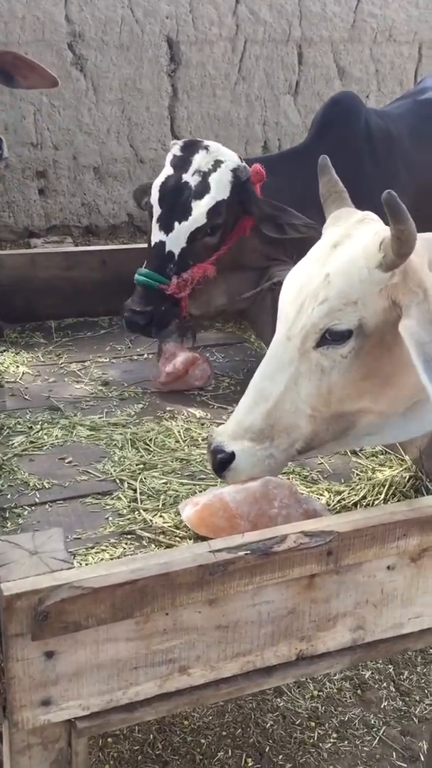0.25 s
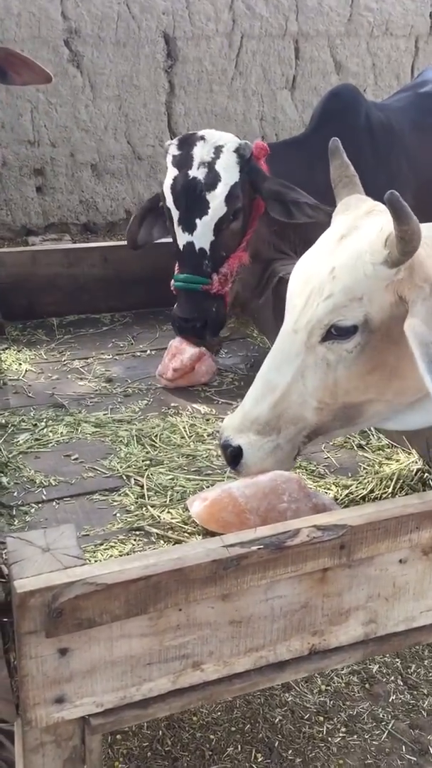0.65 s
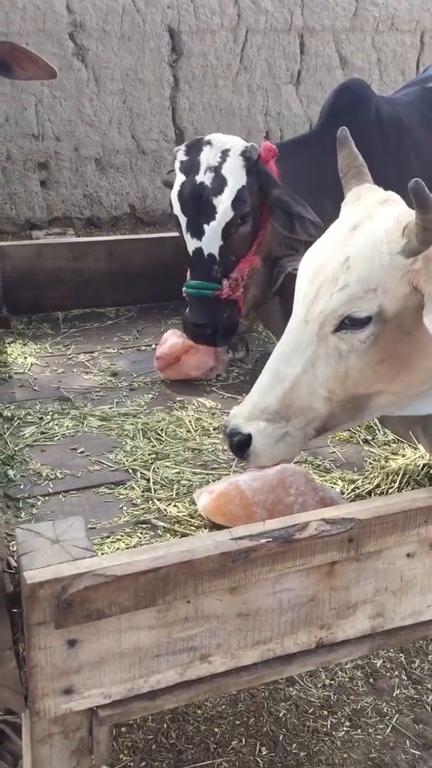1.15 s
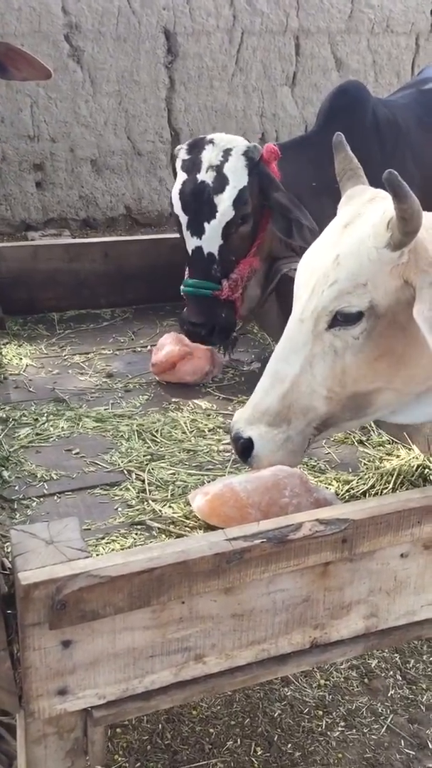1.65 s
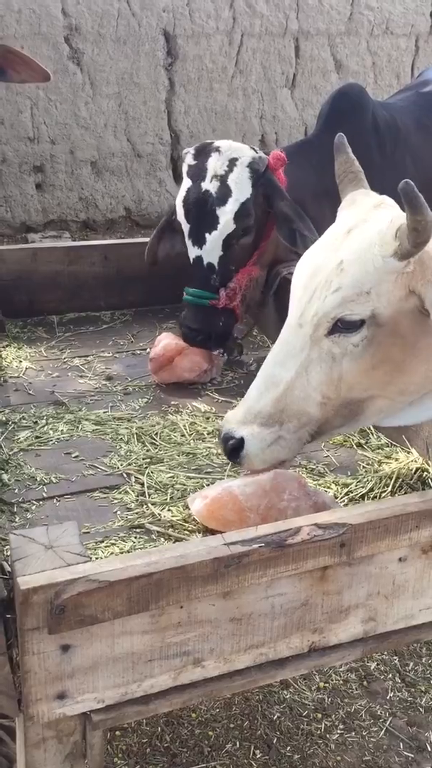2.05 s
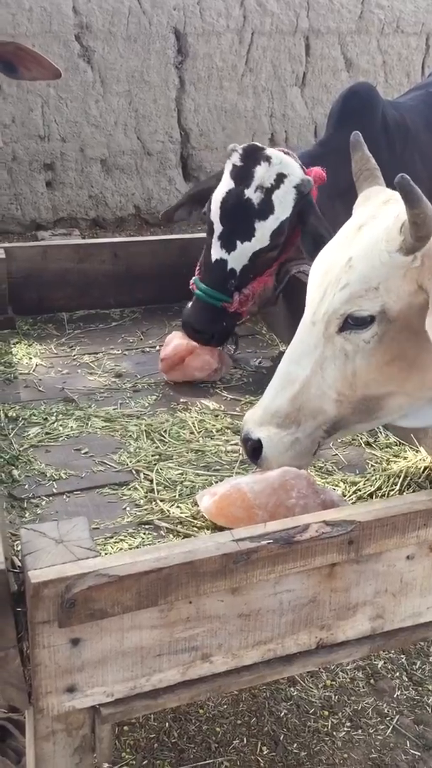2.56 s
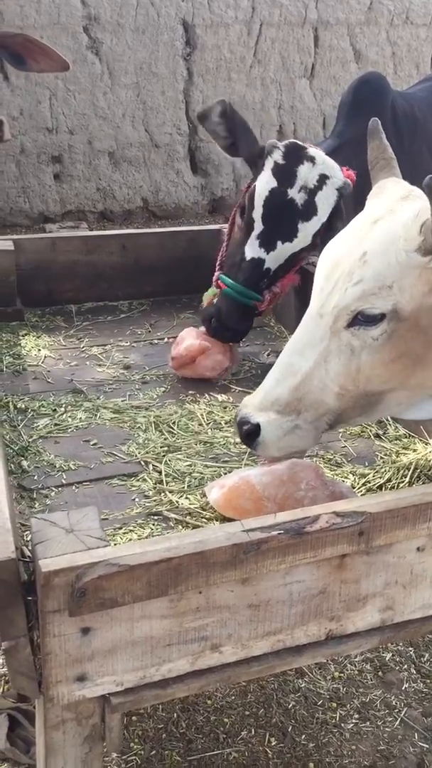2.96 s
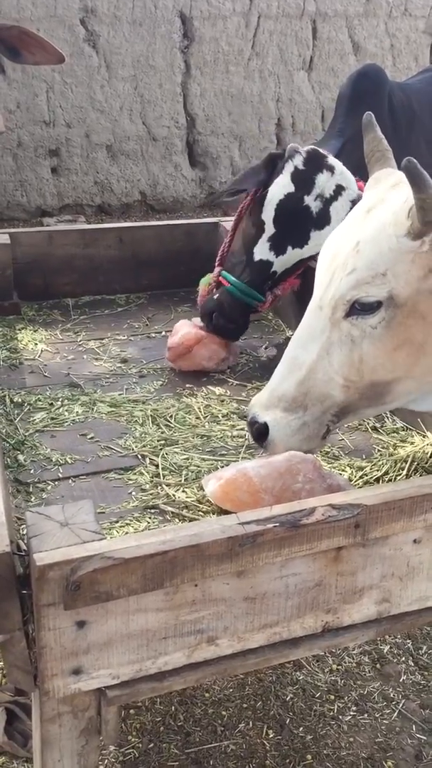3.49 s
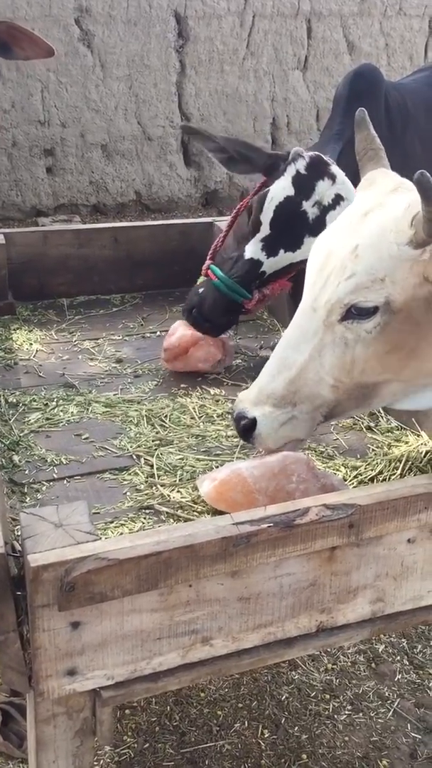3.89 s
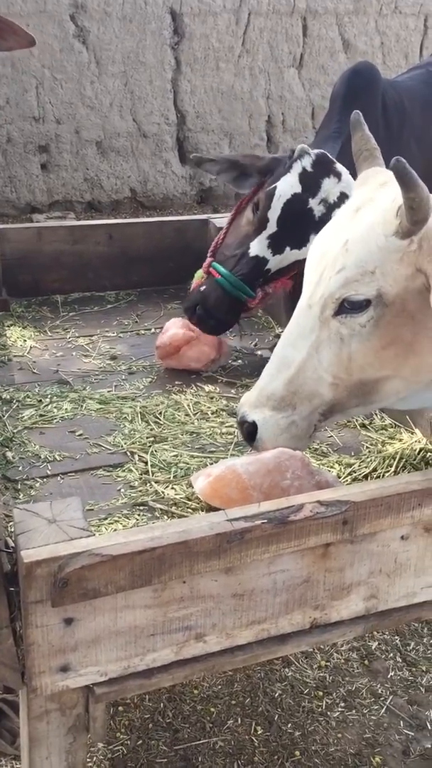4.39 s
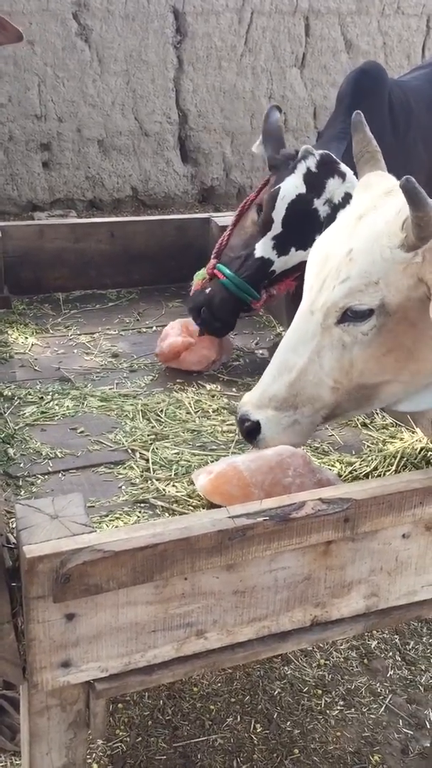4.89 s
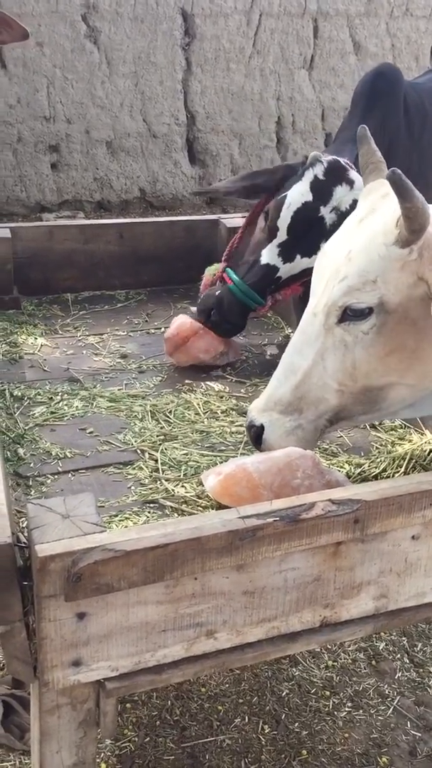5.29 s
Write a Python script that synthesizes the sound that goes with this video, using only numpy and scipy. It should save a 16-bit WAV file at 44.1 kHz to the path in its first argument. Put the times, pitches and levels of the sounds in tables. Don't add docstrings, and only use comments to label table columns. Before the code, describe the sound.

An early flurry of rough tongue strokes and wooden knocks eases into quieter wet dabs, then rasping returns around one second. Bright crackling snaps follow near 1.7 seconds, and heavier knocks cluster near three. Licking, dragging and hollow thuds continue unevenly to the end. Small squeaks and occasional faint sparrows sit above light breeze and low rumble, with a short dull echo from mud walls and a near microphone.

```python
import sys
import numpy as np
from scipy import signal
from scipy.fft import rfft, irfft, next_fast_len
from scipy.io import wavfile
from scipy.ndimage import uniform_filter1d

SR = 44100
rng = np.random.default_rng(int(sys.argv[2]) if len(sys.argv) > 2 else 0)


def dump(signal):
    limited = np.clip(np.atleast_2d(signal).T, -1, 1)
    pcm = np.round(limited * 32767).astype(np.int16)
    wavfile.write(sys.argv[1], SR, pcm)


def elevation(decibels):
    levels = np.asarray(decibels, float)
    return 10 ** (levels / 20)


N = 244307

# f/Hz, level/dB, t60/s
BOARDS = [(73.6, -42, 0.24), (103.4, -3, 0.18), (131.9, 5, 0.11), (159.7, -0.5, 0.11), (204.7, -3, 0.12)]
# f/Hz, level/dB, t60/s
BOX = [(245.2, 2.5, 0.06), (284, 1.5, 0.07), (309.8, 1.5, 0.084), (349, -7.5, 0.073), (387, -3.5, 0.069)]
# f/Hz, level/dB, t60/s
CRACK = [(520, -20, 0.21), (573, -2.5, 0.13), (685, 1, 0.06), (739, 3.5, 0.069), (882, 0, 0.053),
         (950, -2, 0.053), (1071, 4, 0.039), (1187, -7.5, 0.052), (1366, -5.5, 0.054), (1500, -3.5, 0.043)]


def unit(x):
    return x / np.sqrt(np.mean(x ** 2))


def band(x, hz, width_hz):
    return signal.lfilter(*signal.iirpeak(hz, hz / width_hz, SR), x)


def walk(rate):
    k = int(SR / rate)
    held = np.repeat(rng.standard_normal(N // k + 1), k)
    return 2.43 * uniform_filter1d(held, k)[:N]


def grains(rate, spread_db):
    struck = rng.random(N) < rate / SR
    return struck * rng.standard_normal(N) * elevation(spread_db * rng.exponential(size=N))


def add(out, s, sound):
    i = int(s * SR)
    out[i:i + len(sound)] += sound[:N - i]


def colour(table, hz):
    f, db = np.transpose(table)
    return np.interp(np.log(hz), np.log(f), db, left=-60, right=-60)


def contacts():
    # t/s, box peak level/dB, floor-board level/dB, tick level/dB, mode nearest the spot f/Hz
    blows = [(0.228, -17, -7, -27, 223), (0.266, -25, -3, -33, 148), (0.303, -27, -3, -17.5, 277),
             (.34, -29.5, -13, -22, 280), (1.347, -30.5, -9, -18, 275), (1.853, -30, -0.5, -42, 132),
             (2.344, -20, -4, -27, 307), (2.615, -15, -4, -21, 283), (2.656, -23, 3.5, -37, 273),
             (2.698, -15, -4.5, -24, 294), (2.719, -20, -1, -15.5, 283), (2.965, -11, -4, -30, 296),
             (2.991, -21.5, -3.5, -41, 206), (3.019, -24, -5, -39, 312), (3.049, -20, -6, -32, 145),
             (3.069, -20.5, -5, -44, 1090), (3.627, -17, -2, -25, 123), (3.944, -22, -1.5, -40, 333),
             (4.214, -32, -8, -41, 348), (4.268, -31, -4, -8, 360), (4.334, -24, 0, -29, 296),
             (4.356, -6.5, -5.5, -26.5, 323.6), (4.815, -31.5, -12.5, -17, 303), (4.929, -16, 1, -11, 140),
             (5.187, -21.5, -3.5, -35, 325), (5.467, -22.5, -6.5, -32, 318),
             (5.513, -12.5, 0.5, -17.5, 298)]
    # t/s, box peak level/dB, floor-board level/dB, crack level/dB, spot f/Hz
    rocks = [(0.056, -43, -18, -14, 262), (0.117, -53, -18, -30.5, 300), (0.167, -35.5, -27, -28, 300),
             (0.208, -33.5, -6, -17, 308), (1.035, -45, -3, 0, 1370), (1.116, -37, -4, -5, 271),
             (1.15, -49, 11, -10, 132), (1.208, -48, 9.5, -18, 205), (1.27, -40, 7.5, -34, 202),
             (1.729, -41, 3.5, -10, 206), (1.784, -42.5, -18, -1.5, 520), (1.944, -35, 11, -5, 140.6),
             (2.183, -42, -19, -16, 285), (2.275, -32.5, 0, -9, 357), (2.541, -42.5, 4, -7, 130),
             (2.843, -32.5, -2, -13.5, 330), (3.118, -39, 4, -4, 130), (3.165, -43, 4, -10, 132),
             (3.213, -47, -3, -10, 132), (3.312, -35, -15, -14.5, 386), (3.49, -71, 19.5, -11, 74),
             (3.562, -44.5, -19, -8.5, 354), (3.617, -33, 2, -11, 313), (3.662, -30, 4, -8.5, 138),
             (3.715, -40.5, 3, -6, 1110), (3.775, -51, 4, 4.5, 990), (3.877, -41, -6, -10, 373),
             (4.025, -29.5, 0.5, -11.5, 310), (4.058, -33, 8, -29, 106.3), (4.318, -32, 6, -2, 151),
             (4.391, -27, -2, -10, 132), (4.509, -38.5, 2.5, -3, 1077), (4.525, -37.5, -2.5, -9.5, 105),
             (4.71, -50.5, -10, -6, 248), (4.867, -34, -7, -5.5, 385), (5.117, -51, -10, -17, 310),
             (5.223, -34.5, 5.5, -10, 104), (5.355, -38.5, -9, -1.5, 383), (5.448, -47, -13, -11, 314),
             (5.493, -30, 5, -6, 1077)]
    # t/s, crack peak level/dB, tick level over the crack/dB,
    # box level against the crack/dB, spot f/Hz
    taps = [(.062, -51, 6, -1, 1366), (2.553, -57.5, 2, 0, 1500), (2.782, -46.5, -7.5, -10, 1500),
            (4.161, -52, -3, -16, 1187), (4.526, -58, -0.5, -3, 1077), (.447, -33, -3.5, -15.5, 890),
            (0.783, -47, -9, -14, 580), (0.857, -43, -18, -23, 1090), (1.467, -46, -20, -7, 1110),
            (2.915, -33, -10, -25, 1187), (4.438, -35.5, -2.5, -1, 920), (4.983, -40.5, 0, 1, 296),
            (5.298, -43, -10, -15, 750)]
    hits = [(s, db, board_db, -8, tick_db, 0.79, hz, False) for s, db, board_db, tick_db, hz in blows]
    hits += [(s, db, board_db, crack_db, -32.5, 0.78, hz, False) for s, db, board_db, crack_db, hz in rocks]
    hits += [(s, db + box_db, 5.5, -box_db, tick_db - box_db, 0.93, hz, True)
             for s, db, tick_db, box_db, hz in taps]
    return hits


def rumble():
    # t/s, level/dB
    puffs = [(.6, -50), (.85, -64), (1.42, -49), (2.85, -44), (4.68, -50), (.01, -43), (.68, -51),
             (1.08, -41), (1.68, -44), (3.2, -61), (3.5, -49), (4.98, -48), (5.28, -44.5)]
    shake_db, decay_s = -20.5, 0.052
    kicks, keep = np.zeros(N), np.exp(-1 / (decay_s * SR))
    trembles = [(s, db + board_db + shake_db) for s, db, board_db, *_ in contacts()]
    for s, db in trembles + puffs:
        add(kicks, s, np.array([elevation(db)]))
    return uniform_filter1d(signal.lfilter([1], [1, -keep], kicks), SR // 100)


def yard():
    # f/Hz, level per Hz/dB
    air = [(40, -6), (100, -16.5), (200, 1), (500, -16.5), (1300, -12), (3000, -18.5), (7000, -24.5),
           (15500, -28)]
    yard_db, swell_db, flicker_db = -64.5, 0.3, 0.9
    breeze_db, gust_db, gusts_per_s = -63, 3, 3.8
    out, swell = 0, walk(1.0)
    for hz in 42 * 2 ** np.arange(0, 8.6, 0.5):
        gain = elevation(colour(air, hz) + swell_db * swell + flicker_db * walk(3.62))
        noise = rng.standard_normal(N)
        out = out + gain * band(band(noise, hz, 0.62 * hz), hz, 0.62 * hz)
    breeze = unit(band(band(rng.standard_normal(N), 54.4, 58), 54.4, 58))
    gusts = elevation(breeze_db + gust_db * walk(gusts_per_s))
    return elevation(yard_db) * unit(out) + (gusts + rumble()) * breeze


def strokes():
    # t/s, length/s, rasp level/dB, share spent pressing harder, mouth resonance f/Hz
    licks = [(0, 0.14, -55, 0.035, 8300), (0.091, 0.16, -47, 0.83, 6000), (0.197, 0.14, -42.5, 0.57, 8500),
             (0.85, 0.24, -63.5, 0.51, 11400), (0.988, 0.14, -49.5, 0.47, 5800),
             (1.084, 0.14, -51.5, 0.52, 6250), (1.592, 0.1, -49.5, 1, 9400),
             (1.715, 0.058, -63, .45, 12000), (1.863, 0.14, -61, 0.25, 6900),
             (1.965, 0.037, -67, 0.4, 12000), (1.99, 0.11, -50.5, 0.4, 5740), (2.049, 0.094, -51, 1, 12300),
             (2.341, 0.032, -43.5, 0.47, 9400), (2.876, 0.12, -53.5, 0.46, 7500),
             (2.961, 0.052, -44.5, 0.52, 8850), (2.997, 0.08, -46, .6, 6300),
             (3.058, 0.078, -53, 0.18, 9300), (3.555, 0.13, -60, 0.56, 10800),
             (3.641, 0.056, -47.5, 0.45, 5540), (3.684, 0.11, -47, 0.28, 7940),
             (3.769, 0.18, -58.5, .46, 6560), (3.905, 0.083, -49.5, 0.82, 6000),
             (4.25, 0.14, -51.5, 0.74, 6340), (4.364, 0.066, -50, 0.88, 8700),
             (4.665, 0.23, -60, 0.09, 7160), (4.777, 0.16, -56, 0.74, 6300),
             (4.862, 0.096, -47.5, 0.61, 8500), (4.936, .075, -44.5, 0.38, 5400),
             (5.45, 0.15, -54.5, 0.73, 8500)]
    # t/s, length/s, rasp level/dB, spit level over the rasp/dB
    dabs = [(0.332, 0.12, -78, -3), (3.99, 0.067, -73, -2), (4.438, 0.056, -72, 10),
            (5.008, 0.054, -71, -3), (0, 0.098, -76, 11.5), (0.28, 0.14, -64, 8), (0.754, 0.16, -76, 15.5),
            (1.197, 0.37, -74.5, 7.5), (1.443, 0.047, -66.5, 7), (1.63, 0.092, -66.5, 4.5),
            (2.154, 0.25, -70.5, 7), (2.284, 0.066, -64, 0), (2.377, 0.19, -77, 9),
            (2.543, 0.38, -73.5, 9.5), (2.986, 0.1, -63.5, 10), (3.082, 0.14, -71.5, 6.5),
            (3.203, 0.31, -79, 6.5), (3.473, 0.029, -65, -7), (4.084, 0.26, -72.5, 6.5),
            (5.121, 0.11, -72, 9.5), (5.198, 0.056, -86.5, 28.5), (5.277, 0.34, -77, 6),
            (5.488, 0.22, -67, 20)]
    full = [(*lick, -9) for lick in licks]
    return full + [(s, length, db, 0.26, 10000, spit_db) for s, length, db, spit_db in dabs]


def stroke_shapes():
    for s, length, db, rise, mouth_hz, spit_db in strokes():
        u = np.linspace(0, 1, int(length * SR))
        rise = np.clip(rise, 0.05, 0.95)
        press = np.minimum(u / rise, (1 - u) / (1 - rise))
        shape = elevation(db - 5.14 * (1 - press)) * np.minimum(press / 0.45, 1)
        slide = np.exp(-1 / (SR * 0.0099))
        tail = signal.lfilter([1 - slide], [1, -slide], np.append(shape, np.zeros(SR // 10)))
        yield s - 0.006, tail, mouth_hz, spit_db


def tongues():
    # f/Hz, level per Hz/dB
    rasp = [(2300, -11.5), (3500, -5.5), (5800, -3.5), (7400, -5.5), (8700, 1.5), (12000, -2), (14000, -4),
            (16500, -6.5)]
    # f/Hz, level per Hz/dB
    wet_drag = [(90, -4), (300, 4), (500, -4.5), (800, 8), (1300, -0.5), (2100, 5.5), (3500, -24.5),
                (5200, -10)]
    mouth_db, mouth_octaves = 7, 0.21
    flurry_db, flicker_db = 0.8, 1.4
    size = next_fast_len(N)
    slips = rfft(unit(grains(5000, 0.85)) + 0.66 * rng.standard_normal(N), size)
    octaves = np.log2(np.arange(1, len(slips) + 1) * SR / size)
    out, flurry, shapes = 0, walk(70), list(stroke_shapes())
    for hz in 94 * 2 ** np.arange(0, 7.4, 1 / 3):
        gain = np.zeros(N)
        for s, shape, mouth_hz, spit_db in shapes:
            mouth = np.exp(-(np.log2(hz / mouth_hz) / mouth_octaves) ** 2)
            rasp_db = colour(rasp, hz) + mouth_db * mouth
            wet_db = colour(wet_drag, hz) + spit_db + 3.5
            add(gain, max(s, 0), shape * (elevation(rasp_db) + elevation(wet_db)))
        third = irfft(slips * np.exp(-18 * (octaves - np.log2(hz)) ** 2), size)[:N]
        out = out + gain * elevation(flurry_db * flurry + flicker_db * walk(60)) * third
    return elevation(-1.35) * out


def squelch():
    wet, bubbles, t = np.zeros(N), np.zeros(N), np.arange(400) / SR
    for s, shape, _, spit_db in stroke_shapes():
        add(wet, max(s, 0), shape * elevation(spit_db))
    for when, pitch, size, cycles in rng.random((1500, 4)):
        hz = 1300 * 2 ** (2.2 * pitch)
        fade_s = (3 + 9 * cycles) / hz / 2
        envelope = np.exp(-t / fade_s) * (1 - np.exp(-t / 0.00049))
        bubble = np.sin(2 * np.pi * hz * t * (1 + 12 * t)) * envelope
        add(bubbles, when * N / SR, elevation(-3.0 * np.log(size + 0.061)) * bubble)
    return elevation(-6.0) * wet * unit(bubbles)


def pressure(board_share):
    # t/s, length/s, weight on the wood level/dB, lean from boards to box/dB
    drags = [(0, 0.053, -52.5, 1), (0.218, 0.13, -39.5, 2.5), (0.387, 0.17, -56.5, -6.5),
             (0.595, 0.11, -74, -16), (1.028, 0.11, -48, 0), (1.212, 0.16, -50, -26),
             (1.678, 0.087, -51, -14), (1.852, 0.18, -46.5, -24.5), (2.186, 0.24, -49.5, -2),
             (2.596, 0.17, -43, -5.5), (2.82, 0.085, -51, -3), (2.964, 0.17, -41, -4.5),
             (3.106, 0.071, -46.5, -23), (3.64, 0.11, -43.5, -9), (3.946, 0.11, -35, -15),
             (4.23, 0.34, -46, -15), (4.43, 0.23, -60.5, -5), (4.787, 0.26, -46.5, -7),
             (5.178, 0.22, -57, -28), (5.453, .1, -48.5, -2)]
    attack_s, release_s, rest_db, rest_lean_db = 0.016, 0.022, -73.5, -9
    t = np.arange(N) / SR
    out = elevation(rest_db - board_share * rest_lean_db)
    for s, length, db, lean_db in drags:
        attack = np.clip((t - s) / attack_s + 1, 0, 1)
        release = np.exp(-np.maximum(t - s - length, 0) / release_s)
        out = out + elevation(db - board_share * lean_db) * attack * release
    return out


def grind():
    bumps, out = grains(1200, 1.5), 0
    families = [(BOARDS, elevation(-9.5) * pressure(0.3), 0.003),
                (BOX, pressure(-1.28), 0.0012),
                (CRACK, elevation(-14.5) * pressure(-1.46), 0.0004)]
    for modes, gain, contact_s in families:
        push = np.convolve(bumps, np.hanning(int(2 * contact_s * SR)))[:N]
        hum = sum(elevation(db) * band(band(push, hz, 2.25 / t60), hz, 0.51 * hz) for hz, db, t60 in modes)
        out = out + gain * unit(hum)
    return out


def calls():
    # t/s, length/s, from f/Hz, to f/Hz, level/dB
    hums = [
        (.01, 0.052, 520, 620, -58),
        (0.359, 0.19, 544, 520, -51.5),
        (0.29, 0.17, 330, 280, -52),
        (1, .07, 770, 600, -60.5),
    ]
    # t/s, f/Hz, level/dB
    squeaks = [(0.054, 1306, -53), (1.099, 1300, -51), (1.1, 1760, -51.5), (1.098, 1960, -53),
               (3.478, 1450, -57), (3.508, 1500, -55), (3.88, 870, -54), (4.188, 1830, -58),
               (1.751, 2210, -56), (1.911, 7480, -50), (2.092, 2134, -52), (2.247, 1180, -44),
               (2.328, 1947, -42.5), (2.648, 1760, -43), (2.647, 2060, -46), (3.875, 2240, -51),
               (3.508, 1930, -49.5), (3.477, 2840, -59.5), (4.708, 2014, -45), (5.296, 2020, -47.5),
               (5.325, 2210, -53.5), (5.392, 3500, -57.5)]
    # t/s, length/s, from f/Hz, to f/Hz, level/dB
    sparrows = [(0.19, 0.07, 3700, 3560, -46.5), (1.901, 0.04, 5200, 3860, -58),
                (2.078, 0.073, 4300, 4390, -50.5), (2.61, 0.021, 4300, 4300, -61),
                (2.644, .048, 6150, 5340, -56.5), (2.674, 0.034, 4800, 2530, -55.5),
                (4.696, 0.045, 6800, 6650, -56.5), (4.818, 0.053, 5970, 6630, -54),
                (5.122, 0.041, 4500, 3400, -60.5), (5.161, 0.023, 2000, 2300, -55),
                (5.192, 0.071, 3260, 3840, -60), (5.246, 0.042, 2980, 2670, -63)]
    squeak_s, sag = 0.019, 0.97
    tones = [(*sparrow, 0.76) for sparrow in sparrows] + [(*hum, 0.42) for hum in hums]
    return tones + [(s, squeak_s, hz, hz * sag, db, 0.41) for s, hz, db in squeaks]


def chirps():
    out = np.zeros(N)
    for s, length, from_hz, to_hz, db, rough in calls():
        u = np.linspace(0, 1, int(length * SR))
        noise = rng.standard_normal(SR // 2)
        flutter = unit(uniform_filter1d(noise, int(60000 / from_hz ** 0.85)))[:len(u)]
        tone = np.sin(2 * np.pi * np.cumsum(from_hz + (to_hz - from_hz) * u) / SR)
        swell = np.sin(np.pi * u) ** 0.36
        add(out, s, elevation(db) * swell * (1 - rough + rough * flutter) * tone)
    return out


def ring(modes, t, longer, contact_s, spot_hz, chance):
    spot_db, spot_octaves = 9.5, 0.2
    hz, db, t60 = np.transpose(modes)[:, :, None]
    count = len(modes)
    db = db + spot_db * np.exp(-(np.log2(hz / spot_hz) / spot_octaves) ** 2) + 1.92 * chance[1, :count, None]
    hz = hz * (1 + 0.016 * chance[0, :count, None])
    phase = 1.2 * chance[1, ::-1][:count, None]
    decay = np.exp(-np.log(1000) * t / (t60 * longer))
    y = (elevation(db) * np.sin(2 * np.pi * hz * t + phase) * decay).sum(axis=0)
    y = y * (1 - np.exp(-t / contact_s)) ** 2
    return y / np.abs(y).max()


def stony_tick(noise, t):
    tick_hz, width_hz, t60_s = 2300, 1700, 0.046
    lump_hz, lump_width_hz, lump_db = (1760, 2060, 2450, 3315), 92, -2
    tick = noise * np.exp(-np.log(1000) * t / t60_s) * (1 - np.exp(-t / 0.00012))
    tick = band(band(tick, tick_hz, width_hz), tick_hz, 3200)
    tick = tick + elevation(lump_db) * sum(band(tick, hz, lump_width_hz) for hz in lump_hz)
    return tick / np.abs(tick).max()


def knocks():
    out, t = np.zeros(N), np.arange(SR // 4) / SR
    hits = contacts()
    chance = rng.standard_normal((len(hits), 3, 2, 10))
    grit = rng.standard_normal((len(hits), len(t)))
    edge = [(hz, db + 13 * np.log2(hz / CRACK[0][0]), t60) for hz, db, t60 in CRACK]
    for (s, db, board_db, crack_db, tick_db, longer, hz, sharp), c, g in zip(hits, chance, grit):
        longer = np.clip(longer, 0.3, 3)
        sound = ring(BOX, t, longer, 0.0026, hz, c[0])
        sound += elevation(board_db) * ring(BOARDS, t, longer, 0.0036, hz, c[1])
        sound += elevation(crack_db - 3.0) * ring(edge if sharp else CRACK, t, longer, 0.00066, hz, c[2])
        sound += elevation(tick_db) * stony_tick(g, t)
        add(out, s, elevation(db) * sound)
    return out


def pops():
    # t/s, peak level/dB, ring f/Hz
    snaps = [(.8684, -50, 12200), (1.125, -35, 12800), (1.9679, -50, 6560), (2.0158, -45, 9050),
             (2.8873, -44, 10700), (2.9003, -42, 8300), (2.9837, -23, 8340), (3.071, -28, 11500),
             (3.483, -53, 8250), (3.6284, -37, 9840), (3.7224, -33, 11400), (3.865, -49, 12000),
             (3.916, -44, 6530), (4.4777, -50, 12500), (4.505, -52, 11490), (4.686, -42, 6930),
             (4.762, -48, 6980), (4.858, -42, 13000), (5.007, -42, 13000), (5.4814, -46, 8710),
             (1.047, -31, 13500), (1.4704, -29.5, 9400), (1.508, -44, 6470), (1.6106, -36, 13600),
             (1.6317, -52, 12000), (1.648, -45, 8410), (1.6564, -39, 8380), (1.665, -22.5, 8300),
             (1.671, -16, 8550), (1.6778, -19, 9500), (1.6834, -26, 9140), (1.6855, -22, 9250),
             (1.724, -34.5, 11600), (2.0888, -19.5, 12000), (2.123, -22, 10000), (2.244, -36.5, 4970),
             (2.3028, -39, 5240), (2.338, -32, 8490), (2.3457, -26, 8700), (2.356, -20, 9100),
             (2.9756, -32, 8200), (2.993, -24, 9100), (3.0626, -27, 9700), (3.5823, -38, 5160),
             (3.6515, -27, 9570), (3.732, -13.5, 11350), (3.8546, -43, 11900), (3.9487, -29.5, 6250),
             (4.1954, -42, 5600), (5.1891, -71, 5220)]
    lead_s = 0.0028
    out, t = np.zeros(N), np.arange(400) / SR
    for s, db, hz in snaps:
        away = np.abs(t - lead_s)
        snap = rng.standard_normal(len(t)) * (np.exp(-away / 0.000091) + 0.11 * np.exp(-away / 0.002))
        pop = band(band(snap, hz, 2000), hz, 4100)
        pop = pop + 0.25 * band(band(snap, 12000, 9100), 7400, 11000)
        add(out, s - lead_s, elevation(db - 7.5) * pop / np.abs(pop).max())
    return out


def walls(near):
    wall_t60_s, wall_db = 0.13, -18
    t = np.arange(SR // 3) / SR
    echo = (t > 0.006) * rng.standard_normal(len(t)) * np.exp(-np.log(1000) * t / wall_t60_s)
    echo = band(echo, 760, 6400)
    return elevation(wall_db) * signal.fftconvolve(near, echo / np.sqrt(np.sum(echo ** 2)))[:N]


def scene():
    far = yard()
    near = tongues() + squelch() + grind() + chirps() + knocks() + pops()
    return (near + walls(near) + far)[None]


def top_cut(x):
    return signal.sosfilt(signal.butter(12, 15710, fs=SR, output="sos"), x)


def record(dry):
    # f/Hz, width/Hz, depth 0-1
    port_dips = [(4800, 130, 0.56), (10330, 1150, 0.53)]
    x = signal.sosfilt(signal.butter(2, 62, "high", fs=SR, output="sos"), dry)
    for hz, width_hz, depth in port_dips:
        x = x - np.clip(depth, 0, 1) * band(x, hz, width_hz)
    x = signal.sosfilt(signal.ellip(12, 0.2, 70, 15750, fs=SR, output="sos"), x)
    return top_cut(x)


dry = scene()
out = record(dry)
dump(out)
```